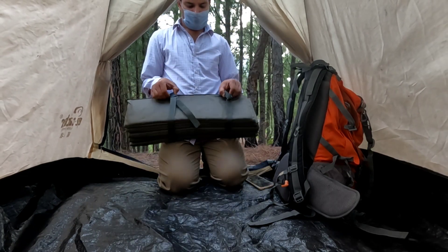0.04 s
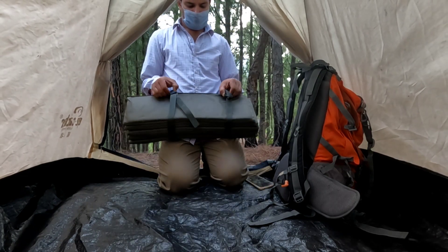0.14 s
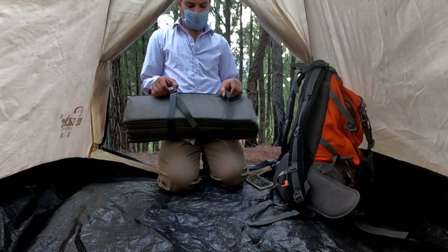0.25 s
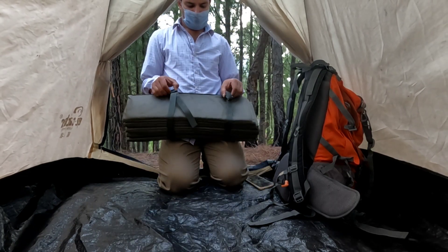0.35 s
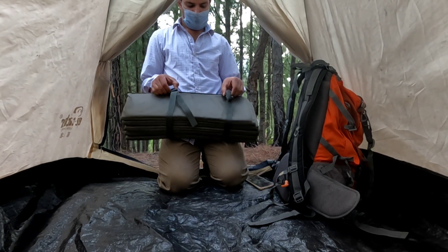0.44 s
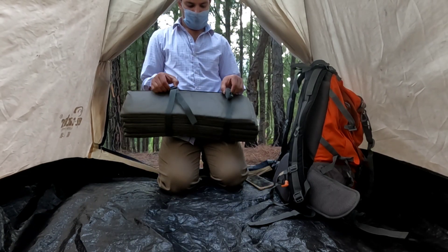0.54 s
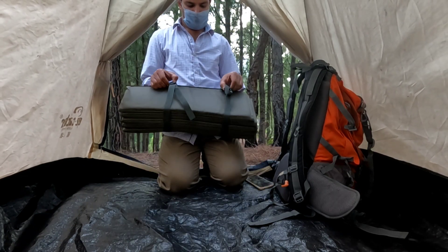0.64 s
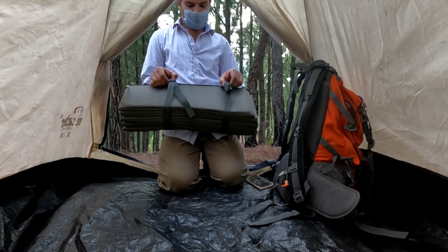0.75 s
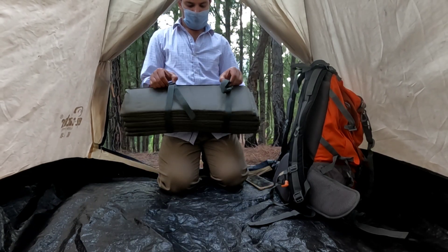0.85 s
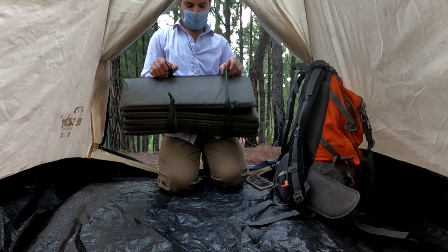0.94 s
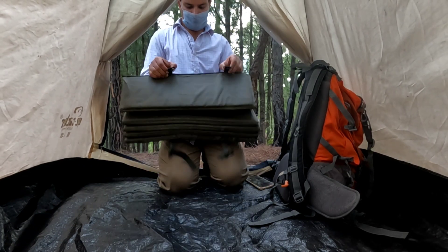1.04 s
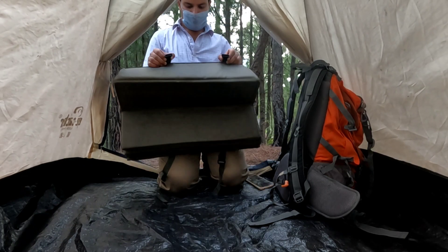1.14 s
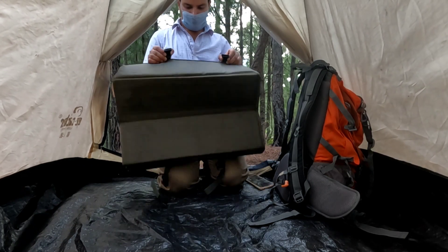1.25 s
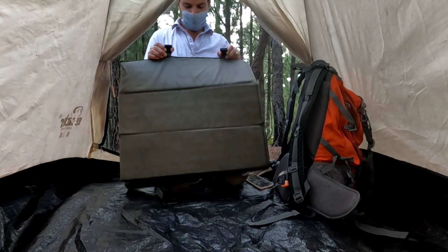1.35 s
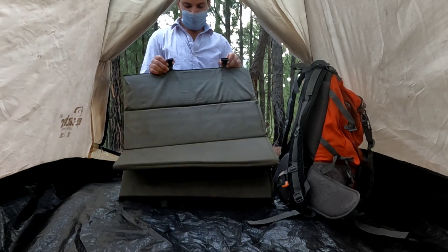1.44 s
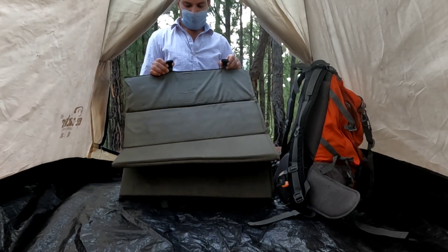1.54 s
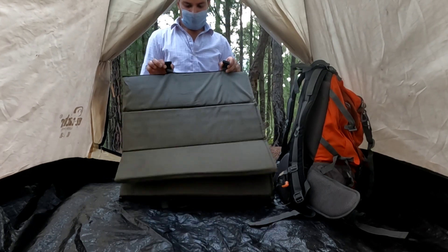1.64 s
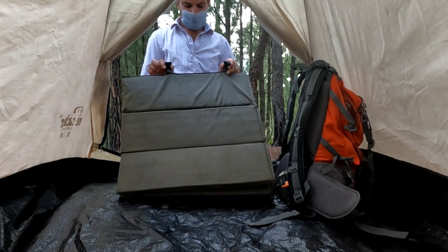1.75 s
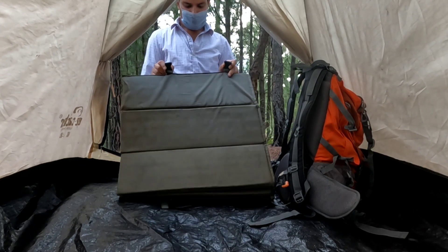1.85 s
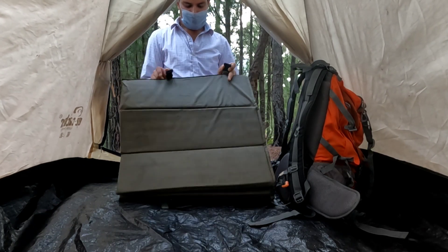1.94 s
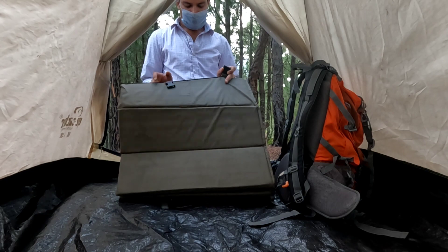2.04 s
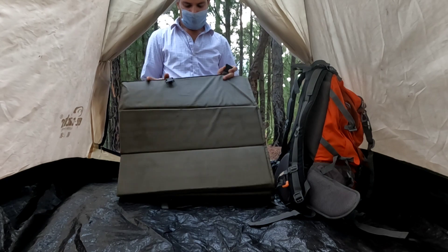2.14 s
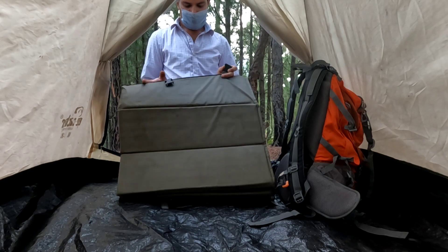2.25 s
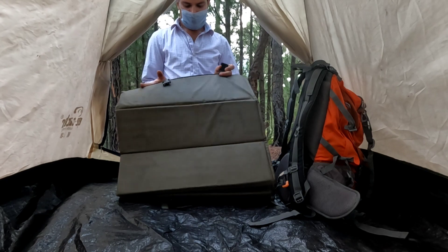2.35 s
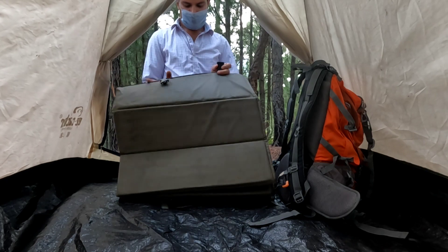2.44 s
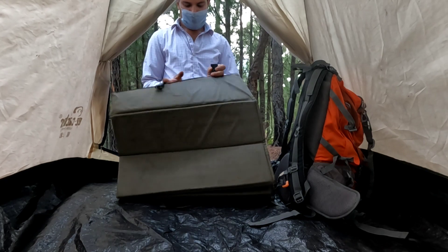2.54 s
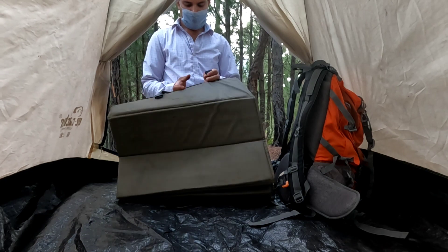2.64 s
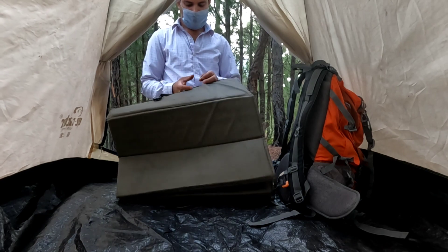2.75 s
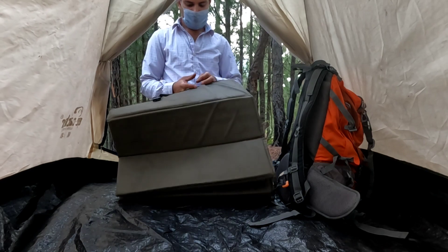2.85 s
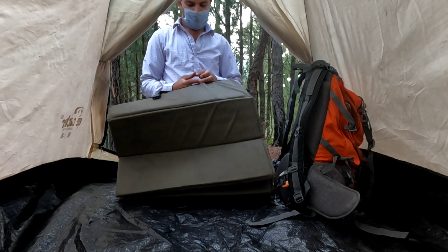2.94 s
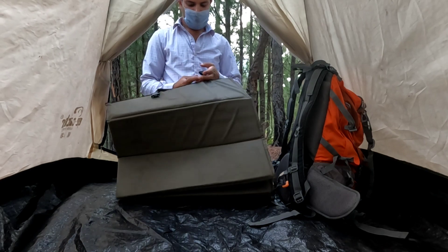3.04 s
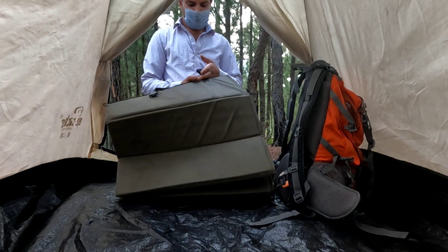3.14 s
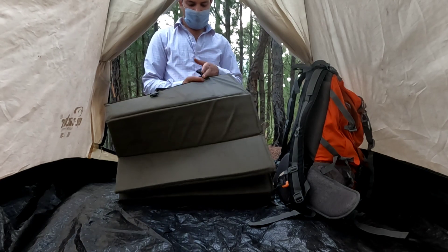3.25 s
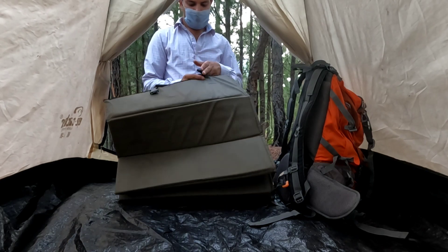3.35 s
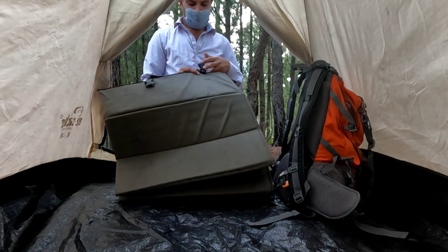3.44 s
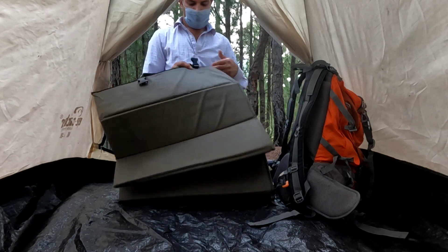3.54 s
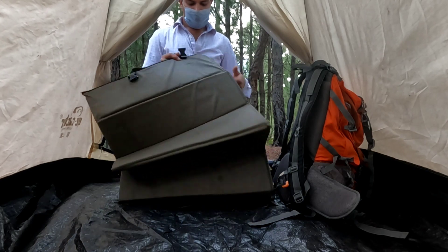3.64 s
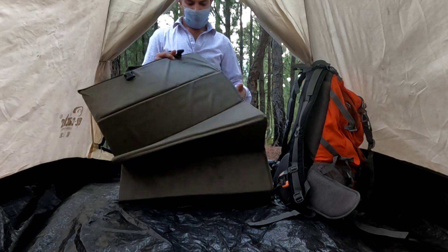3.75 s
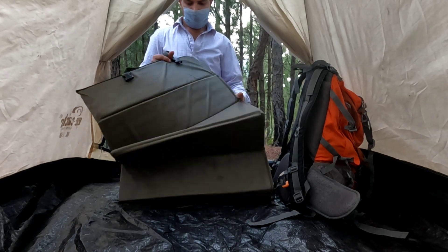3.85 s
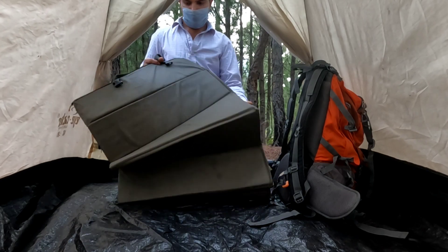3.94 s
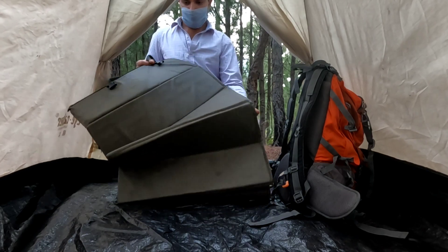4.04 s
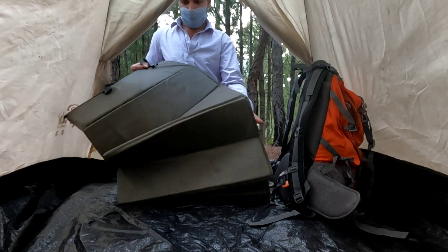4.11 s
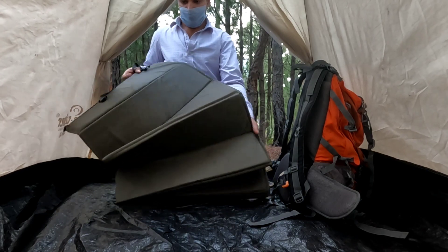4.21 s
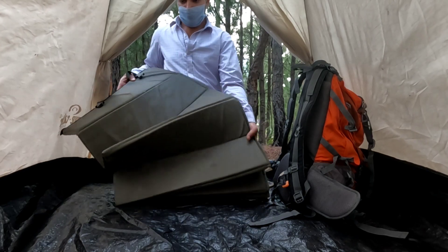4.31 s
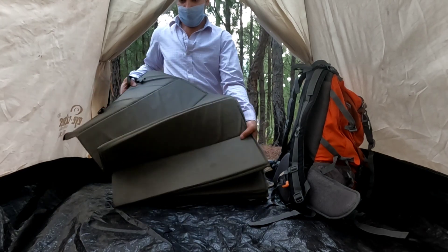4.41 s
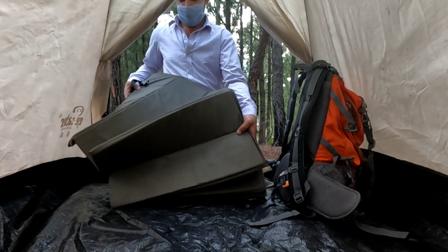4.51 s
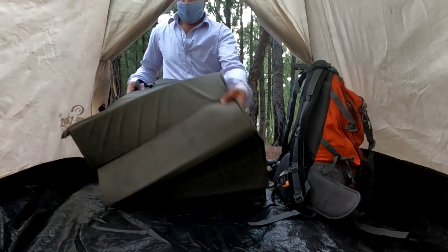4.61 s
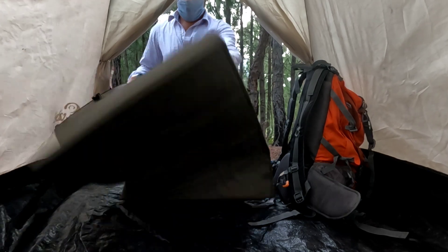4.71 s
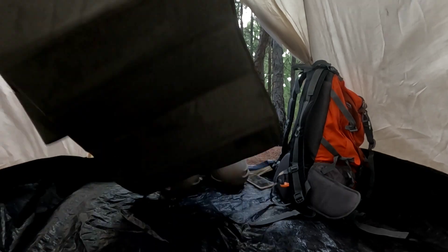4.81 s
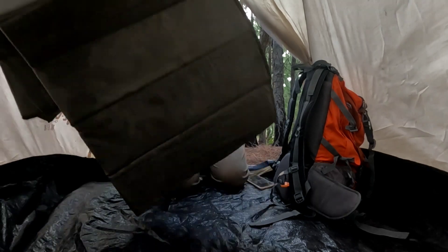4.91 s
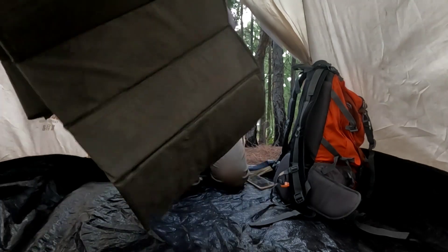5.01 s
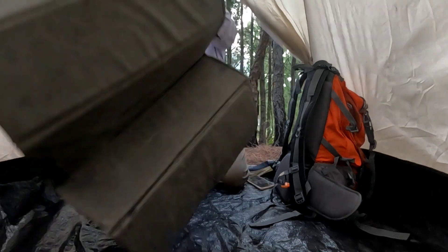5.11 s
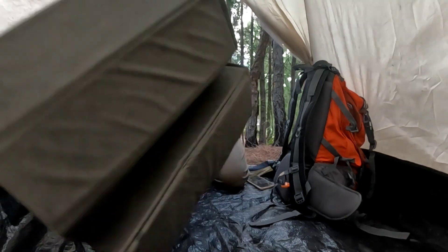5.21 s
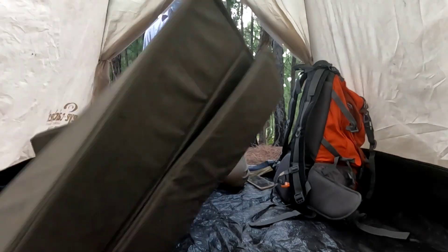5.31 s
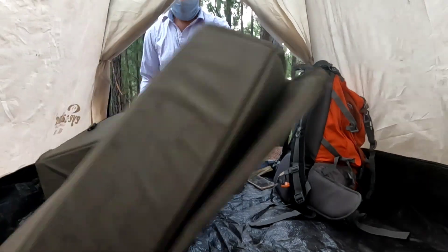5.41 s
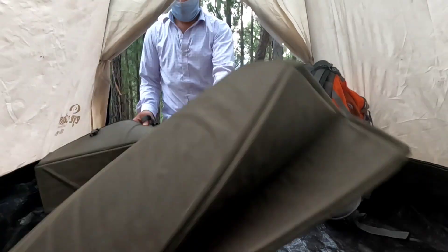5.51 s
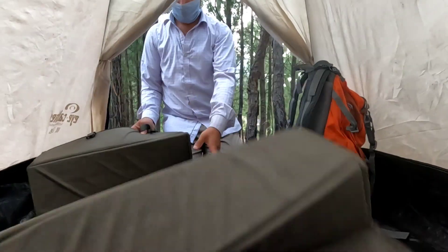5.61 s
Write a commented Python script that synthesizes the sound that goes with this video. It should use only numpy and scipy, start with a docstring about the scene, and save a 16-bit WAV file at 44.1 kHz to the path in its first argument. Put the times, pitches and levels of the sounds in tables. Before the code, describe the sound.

Close stereo sound inside a tent. A strap snaps and nylon rustles faintly, then around one second sharp snaps and soft foam thuds as the mat drops open. Quieter handling and fuzzy cloth zips follow, until panels slap and swing past the microphone, buffeting it with low air. Faint shrill insects and forest rumble lie outside.

```python
"""Inside a tent in a forest, stereo microphone close to a folding foam mattress being opened.
Throughout, a low rumble and shrill insects lie far outside, while the nylon cover hisses under the hands.
From the start straps snap as noise cracks and blows on the foam thud as damped sines; about a second in
a strap sings, then ribbed cloth zips in gliding fuzzy tones, and the groundsheet crinkles in noise ticks.
Near the end the panels slap and swing past the microphone, pushing low puffs and fluttering air."""
import sys
import numpy as np
from scipy import signal
from scipy.fft import rfft, irfft, next_fast_len
from scipy.io import wavfile
from scipy.ndimage import uniform_filter1d, map_coordinates

SR = 44100
rng = np.random.default_rng(int(sys.argv[2]) if len(sys.argv) > 2 else 0)


def file_out(sig):
    """Save sig as 16-bit WAV at sys.argv[1]."""
    # one column per channel
    cols = np.atleast_2d(sig).T
    # limit, then scale
    lim = np.clip(cols, -1, 1)
    pcm = np.round(lim * 32767).astype(np.int16)
    wavfile.write(sys.argv[1], SR, pcm)


N = 250047

# Far outside the tent, low forest rumble: pitch_hz, relative level_db per Hz
FOREST_SPECTRUM = [(12, 4.5), (22, -3.5), (50, -5), (75, -2), (114, -9.5), (168, -3), (322, -15),
                   (400, -17.5), (570, -27.5), (800, -34.5), (1500, -94)]
# Far outside the tent, shrill insects: pitch_hz, relative level_db per Hz
INSECT_SPECTRUM = [(600, -23.5), (1300, -10.5), (2800, -26), (3900, -30), (4600, -13.5), (5150, 0),
                   (5650, 2), (6100, -7.5), (6600, -29), (7600, -14), (8400, -27), (12000, -33),
                   (16000, -56)]
# Likeness of the two microphone channels: pitch_hz, likeness (0 unrelated, 1 identical)
CHANNEL_LIKENESS = [(30, 0.95), (125, 0.98), (300, 0.84), (1000, 0.73), (2000, 0.69), (5000, 0.61),
                    (8000, 0.84), (12000, 0.43)]
# Treble balance of the two ports: pitch_hz, lean_db (added on the left, taken off the right)
PORT_LEAN = [(1000, -0.46), (4000, 0.14), (9000, 0.97)]
# Air stirred at the microphone by passing panels, before port balance and flutter:
# strongest_s, rise_s, fall_s, level_db
GUSTS = [(4.88, .07, .14, -38), (5.21, .22, 0.19, -22.5), (5.62, 0.18, .2, -30.5)]
# Turbulence at the microphone ports: pitch_hz, relative level_db per Hz
EDDY_SPECTRUM = [(3, -8), (10, 0), (18, 1), (30, -6), (55, -11.5), (85, -16.5), (130, -31.5), (250, -57),
                 (600, -90)]
# Air shoved by a swinging panel, swaying the tent:
# start_s, level_db (of the sway's peak, before panning), pitch_hz, t60_s, left_minus_right_db
PUFFS = [(1.57, -33, 50.2, 0.31, -2), (3.962, -38.5, 39.8, 0.17, 0), (4.868, -23.5, 49.3, 0.31, 0),
         (5.034, -15, 50.6, 0.14, -9), (5.11, -21.5, 45, 0.34, -2), (5.395, -19.5, 49.7, 0.18, 0)]
# Groundsheet crinkling under the mattress edge: start_s, length_s, level_db (before the fades)
CRINKLES = [(1.552, 0.098, -54), (2.919, 0.084, -56.5), (3.061, 0.12, -55.5), (3.41, 0.055, -52.5),
            (4.63, 0.073, -53), (5.002, 0.11, -41.5), (5.268, 0.045, -40)]
# Stiff plastic groundsheet: pitch_hz, relative level_db per Hz
SHEET_SPECTRUM = [(200, -9), (500, -1.5), (800, -5.5), (1250, -2.5), (2200, -6.5), (4000, -14), (8000, -21),
                  (16000, -36)]
# Ribbed cloth zipping over itself:
# start_s, length_s, start_pitch_hz, end_pitch_hz, level_db (of the lower tone, before the fades)
ZIPS = [(1.352, 0.13, 1500, 2690, -58), (1.805, 0.28, 2595, 2880, -63.5), (2.165, 0.3, 2700, 2815, -57.5),
        (2.548, 0.11, 1870, 2087, -52), (2.558, 0.2, 2600, 3155, -52), (3.955, 0.03, 1700, 1740, -51.5),
        (4.019, 0.08, 1700, 2506, -53), (4.193, 0.065, 2253, 3780, -42.5), (4.225, 0.052, 1144, 2706, -43),
        (4.234, 0.047, 2956, 3710, -42.5)]
# Straps, buckles and panel edges snapping:
# start_s, level_db (before the decays), centre_hz, width_octaves, ring_hz
SNAPS = [(0.205, -33, 5800, 0.96, 6700), (.936, -46.5, 3750, 0.27, 3780), (1.031, -21, 8150, 0.64, 5100),
         (1.2396, -24, 2700, 1.02, 1700), (1.318, -25.5, 2600, 1.4, 2240), (1.552, -32.5, 2600, 1.3, 2870),
         (1.575, -29.5, 2600, 0.78, 1280), (2.184, -51, 1000, 1.4, 1070), (4.342, -38, 3500, 1.8, 4220),
         (4.772, -35.5, 1310, 1.65, 890), (4.962, -35, 6500, .8, 7000), (5.0565, -31, 1200, 1.6, 800),
         (5.089, -33.5, 1200, 1.1, 1020), (5.156, -39, 1686, 1.23, 1630), (5.405, -34, 700, 1, 790),
         (5.589, -30, 1280, 0.76, 920)]
# Colour of a snap, before its band and ring: pitch_hz, relative level_db per Hz
CRACK_SPECTRUM = [(100, 2), (400, 14.5), (1500, 6), (4000, 7), (5400, 7.5), (6400, 6.5), (8300, 6.5),
                  (10800, -1.5), (12000, 4), (13500, -2), (16000, -20)]
# Soft blows on the foam: start_s, level_db (of the sine's swell at its peak), pitch_hz
THUMPS = [(.204, -40.5, 212), (1.032, -25, 220), (1.091, -35, 330), (1.227, -38, 131), (1.559, -28, 372),
          (2.186, -28.5, 293), (2.286, -33, 158), (2.719, -35, 195), (3.959, -38, 169), (4.146, -30.5, 213),
          (4.342, -31.5, 266), (4.871, -27.5, 77.6), (4.886, -24.5, 178), (4.961, -24.5, 103),
          (5.02, -27, 123), (5.088, -28, 197), (5.183, -32, 70), (5.402, -23.5, 141)]
# Foam panels bending, before the overall lift and flutter: hardest_s, rise_s, fall_s, level_db
BENDS = [(1.1, .03, 0.051, -45.5), (1.24, 0.044, .06, -51), (1.563, .016, 0.038, -40.5),
         (2.72, 0.06, 0.029, -55), (4.35, 0.34, 0.29, -59), (4.89, .1, 0.044, -46),
         (5.04, 0.075, .09, -35.5), (5.18, .1, 0.19, -47), (5.42, 0.064, 0.068, -44),
         (5.59, 0.058, 0.037, -37)]
# Hollow scuff of the foam: pitch_hz, relative level_db per Hz
FOAM_SPECTRUM = [(40, -19), (100, 4.5), (200, 4), (400, -2), (800, -7.5), (1400, -8), (3000, -38),
                 (8000, -48)]
# Light drag of the held cover: time_s, level_db, tilt_db per octave (positive is brighter)
DRAG = [(0, -53, -2), (.8, -78.5, 1), (1, -73, 3), (1.19, -49.5, -3.5), (1.42, -53, 5), (1.7, -62.5, -1),
        (2.1, -56, 0), (2.5, -57, -1), (2.9, -54, 0.2), (3.3, -61, -2.5), (3.55, -52.5, -.5),
        (3.76, -68.5, 2), (3.94, -58.5, -1.5), (4.35, -45.5, -1.5), (4.72, -46.5, -3.5), (5.25, -41.5, 1),
        (5.36, -46, -1), (5.66, -42.5, -1.5)]
# Strokes of nylon over nylon: fastest_s, rise_s, fall_s, level_db, tilt_db per octave
SWISHES = [(.44, .09, 0.1, -56, 0.3), (.645, 0.027, 0.049, -56, -.3), (.865, 0.01, 0.011, -57.5, 1.5),
           (.943, 0.011, 0.018, -51.5, 3.5), (1.095, 0.063, 0.063, -39, -1),
           (1.505, 0.053, .06, -38.5, -1.6), (1.569, 0.04, 0.032, -35.5, -1.5), (1.83, 0.06, .05, -54, -1),
           (1.93, 0.023, .03, -53.5, -.8), (2.35, 0.18, 0.08, -54, -1), (2.595, 0.049, .09, -48, 0),
           (2.735, 0.11, 0.021, -47, -0.5), (3.11, 0.039, 0.063, -54, -3), (3.43, 0.071, 0.066, -53, -2.8),
           (3.67, 0.024, 0.029, -47, 0), (3.967, 0.0085, 0.11, -41, 0.8), (4.08, 0.058, 0.05, -43, 4),
           (4.255, 0.1, 0.16, -42, -0.6), (4.895, 0.092, 0.054, -31.5, 0), (4.968, 0.0055, 0.1, -30.5, 1.9),
           (5.425, 0.041, 0.06, -39, -4), (5.59, 0.13, 0.029, -34.5, -0.3), (5.66, 0.031, .05, -36.5, -3.5)]
# Nylon cover before the tilts: pitch_hz, relative level_db per Hz
NYLON_SPECTRUM = [(350, -10), (600, -12.5), (768, -18), (996, -5), (1100, -6), (1890, -1), (2060, -1),
                  (2860, 0.5), (3700, -1.5), (5210, 0.5), (7050, 0.5), (8300, -4), (12000, -9),
                  (14600, -20), (15800, -30)]

TOP_HZ = 15750  # upper limit of the microphone signal
SWELL_SHAPE = 1.36  # 1 gives a pointed swell, 2 a rounded one
STRAP_START_S, STRAP_LENGTH_S = 1.042, 0.145
STRAP_SLOW_HZ, STRAP_FAST_HZ, STRAP_DB = 270, 861, -48.5  # level before catches and fades
FLAP_T60_S = 0.054
SINK_CYCLES = 0.58  # a blow takes this share of a cycle to sink in


def amp(db):
    """Decibels to gain."""
    return 10 ** (np.asarray(db) / 20)


def unit(x):
    """Scale to rms 1."""
    return x / np.sqrt(np.mean(x ** 2) + 1e-20)


def along(points, hz):
    """Read (Hz, value) points on a log frequency axis."""
    f, v = np.transpose(points)
    return np.interp(np.log(hz + 1), np.log(f), v)


def wobble(rate):
    """A smooth random curve with the given number of knots a second."""
    knots = rng.standard_normal(int(N * rate / SR) + 4)
    return map_coordinates(knots, [np.arange(N) * rate / SR])


def filtered(x, response):
    """Multiply the spectrum of x by a response of frequency."""
    n = x.shape[-1]
    m = next_fast_len(n + 8192)
    hz = np.fft.rfftfreq(m, 1 / SR)
    return irfft(rfft(x, m) * response(hz), m)[..., :n]


def stereo(pair, colour_db):
    """Turn two unrelated signals into a coloured left and right of rms 1, most alike in the bass."""
    def mid_side_response(hz):
        # the angle that gives the wanted correlation between left and right
        turn = np.arccos(np.clip(along(CHANNEL_LIKENESS, hz), -1, 1)) / 2
        return amp(colour_db(hz)) * [np.cos(turn), np.sin(turn)]

    mid, side = filtered(pair, mid_side_response)
    return unit(np.array([mid + side, mid - side]))


def rush(spectrum):
    """Steady stereo noise with the given spectrum."""
    return stereo(rng.standard_normal((2, N)), lambda hz: along(spectrum, hz))


def add(track, s, sound):
    """Mix a sound into a track at time s."""
    part = track[:, max(round(s * SR), 0):][:, :sound.shape[-1]]
    part += sound[..., :part.shape[1]]


def swell(t, peak_s, rise_s, fall_s, db):
    """Gain of one movement: it gathers speed, peaks and slows, 10 dB down one rise before and one fall after."""
    away = np.maximum((peak_s - t) / rise_s, (t - peak_s) / fall_s)
    return amp(db - 10 * np.minimum(away, 10) ** SWELL_SHAPE)


def swells(rows):
    """Gain per sample of overlapping movements, their powers added."""
    t = np.arange(N) / SR
    coarse = t[::64]
    power = sum(swell(coarse, *row) ** 2 for row in rows)
    return np.interp(t, coarse, np.sqrt(power))


def weave(pitch_hz, spread):
    """Threads catch at a scattered rate around the pitch: a fuzzy tone."""
    scatter = unit(uniform_filter1d(rng.standard_normal(len(pitch_hz)), size=30))
    phase = 2 * np.pi * np.cumsum(pitch_hz * (1 + spread * scatter)) / SR
    return np.sin(phase) * np.sqrt(2)


def forest(rumble_db=-52, insect_db=-60):
    """Far outside, a restless low rumble and steady shrill insects: shaped noise, gently wavering."""
    rumble = rush(FOREST_SPECTRUM) * amp(rumble_db + 0.71 * wobble(25))
    insects = rush(INSECT_SPECTRUM) * amp(insect_db + 0.4 * wobble(3.93))
    return rumble + insects


def draught(gust_db=1.0):
    """Turbulent air flutters on the two ports, most on the right, where the panels pass."""
    # part shared between the ports, part separate at each
    ports = unit(filtered(rng.standard_normal((2, N)), lambda hz: amp(along(EDDY_SPECTRUM, hz))))
    turbulence = unit(rush(EDDY_SPECTRUM) + amp(-3.0) * ports)
    air = turbulence * amp([[-1.5], [1.5]])
    return air * swells(GUSTS) * amp(gust_db * wobble(25))


def puffs(attack_s=0.0032, eddy_db=-11):
    """A panel shoves air: the tent sways as a damped low sine and eddies brush each microphone port."""
    out, t = np.zeros((2, N)), np.arange(SR // 2) / SR
    for s, db, pitch_hz, t60, pan_db in PUFFS:
        eddies = unit(filtered(rng.standard_normal((2, len(t))), lambda hz: 1 / (1 + (hz / 75) ** 4)))
        shape = amp(-60 * t / t60) * (1 - np.exp(-t / attack_s))
        sway = np.sin(2 * np.pi * pitch_hz * t) + amp(eddy_db) * eddies
        port_gain = amp([[db + pan_db / 2], [db - pan_db / 2]])
        add(out, s, port_gain * shape / shape.max() * sway)
    return out


def groundsheet(creases_per_s=450, crease_spread_db=4):
    """Creases in the stiff plastic flip over in short flurries of decaying noise ticks."""
    out = np.zeros((2, N))
    for s, length, db in CRINKLES:
        n = int(length * SR)
        sizes = amp(crease_spread_db * np.clip(rng.standard_normal(n), -2, 2))
        flips = (rng.random(n) < creases_per_s / SR) * sizes
        # each flip dies within a few milliseconds
        ticks = signal.lfilter([1], [1, -np.exp(-1 / (0.00086 * SR))], flips)
        crinkle = stereo(ticks * rng.standard_normal((2, n)), lambda hz: along(SHEET_SPECTRUM, hz))
        add(out, s, amp(db) * crinkle * np.hanning(n) ** .5)
    return out


def strap(catch_db=3):
    """A strap drawn over the cover: its weave sings with the speed, arching up in pitch and back down."""
    out, n = np.zeros((2, N)), int(STRAP_LENGTH_S * SR)
    pitch_hz = STRAP_SLOW_HZ * (STRAP_FAST_HZ / STRAP_SLOW_HZ) ** np.bartlett(n)
    tone = weave(pitch_hz, spread=0.2)
    level = amp(STRAP_DB + catch_db * wobble(206)[:n])
    add(out, STRAP_START_S, tone * level * signal.windows.tukey(n, alpha=.2))
    return out


def zips(catch_db=3):
    """Ribbed cloth sings at the rate its threads pass, with an octave above: faster is higher."""
    out = np.zeros((2, N))
    for s, length, start_hz, end_hz, db in ZIPS:
        glide = np.linspace(start_hz, end_hz, int(length * SR))
        tone = weave(glide, spread=0.108) + amp(-4.5) * weave(2 * glide, spread=0.102)
        grip = unit(amp(catch_db * wobble(257.6)[:len(glide)]))  # the cloth catches and lets go
        add(out, s, amp(db) * tone * grip * np.hanning(len(glide)) ** .5)
    return out


def snaps(direct_db=-2, direct_t60=0.009, ring_db=8, ring_octaves=0.11, tent_db=-27, tent_t60=0.39):
    """Each snap is a sharp crack, a short flap with one resonance, and a faint tail from the tent walls."""
    out, t = np.zeros((2, N)), np.arange(SR // 4) / SR
    rise = 1 - np.exp(-t / .0004)
    for s, db, centre_hz, octaves, ring_hz in SNAPS:
        def colour_db(hz):
            band = -10 * np.log10(1 + (np.log2((hz + 1) / centre_hz) / octaves) ** 4)
            ring = ring_db / (1 + (np.log2((hz + 1) / ring_hz) / ring_octaves) ** 2)
            return along(CRACK_SPECTRUM, hz) + band + ring

        noise = stereo(rng.standard_normal((2, len(t))), colour_db)
        crack = amp(direct_db - 60 * t / direct_t60)
        flap = amp(-60 * t / FLAP_T60_S)
        tail = amp(tent_db - 60 * t / tent_t60)
        add(out, s, amp(db) * noise * (crack + flap + tail) * rise)
    return out


def thumps(pat_db=-12):
    """Foam is heavily damped: a blow swells as it sinks in, giving a cycle or two and a dull pat."""
    out, t = np.zeros((2, N)), np.arange(SR // 4) / SR
    for s, db, pitch_hz in THUMPS:
        noise = rng.standard_normal((2, len(t)))
        pat = stereo(noise, lambda hz: -10 * np.log10(1 + (hz / (1.3 * pitch_hz)) ** 8))
        sink = t * pitch_hz / SINK_CYCLES
        shape = (sink * np.exp(1 - sink)) ** 2
        add(out, s, amp(db) * shape * (np.sin(2 * np.pi * pitch_hz * t) + amp(pat_db) * pat))
    return out


def panels(level_db=1, flutter_db=2.5):
    """The foam gives a hollow, fluttering scuff of noise as it bends."""
    return rush(FOAM_SPECTRUM) * swells(BENDS) * amp(level_db + flutter_db * wobble(110))


def friction_controls(t):
    """Gain and tilt of the cover: drag and strokes add in power, and the loudest sets the colour."""
    s, drag_db, drag_tilt = np.transpose(DRAG)
    power = amp(np.interp(t, s, drag_db)) ** 2
    tilted = power * np.interp(t, s, drag_tilt)
    for *movement, tilt in SWISHES:
        stroke = swell(t, *movement) ** 2
        power = power + stroke
        tilted = tilted + tilt * stroke
    return np.sqrt(power), tilted / power


def cover(slips_per_s=6000, slip_spread_db=3, slip_db=-3, patchy_db=2.5, flutter_db=1.22, unsteady_db=1.08):
    """Nylon swishes: a hiss of fine threads plus tiny slips, coloured by the shifting folds."""
    slip_sizes = amp(slip_spread_db * np.minimum(rng.exponential(size=N), np.e))
    slips = (rng.random(N) < slips_per_s / SR) * slip_sizes
    threads = rng.standard_normal((2, N))
    friction = threads + amp(slip_db) * unit(slips * rng.standard_normal((2, N)))
    hiss = stereo(friction, lambda hz: along(NYLON_SPECTRUM, hz))
    hz, s, z = signal.stft(hiss, SR, nperseg=512)
    gain, tilt = friction_controls(s)

    # random patches smoothed over pitch, then time
    folds = uniform_filter1d(rng.standard_normal(z.shape[1:]), size=5, axis=0)
    folds = unit(uniform_filter1d(folds, size=7, axis=1))
    octaves = np.log2(np.clip(hz, 900, 11000) / 4200)[:, None]
    z = z * amp(octaves * tilt + patchy_db * folds)
    swish = signal.istft(z, SR, nperseg=512)[1][:, :N]

    level = np.interp(np.arange(N) / SR, s, gain)
    flutter = amp(flutter_db * wobble(70) + unsteady_db * wobble(18))
    return unit(swish) * level * flutter


def scene():
    """The mattress close to the microphone, with the forest behind."""
    background = forest() + draught() + puffs() + groundsheet()
    mattress = strap() + zips() + snaps() + thumps() + panels() + cover()
    return background + mattress


def record(dry):
    """The left port hears a little more treble; nothing passes the band limit."""
    def port_response(hz):
        lean_db = np.outer([1, -1], along(PORT_LEAN, hz))
        return amp(lean_db) * (hz < TOP_HZ)

    return filtered(dry, port_response)


dry = scene()
out = record(dry)
file_out(out)
```